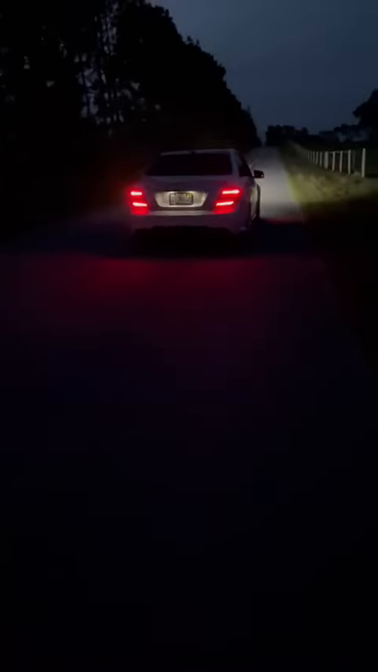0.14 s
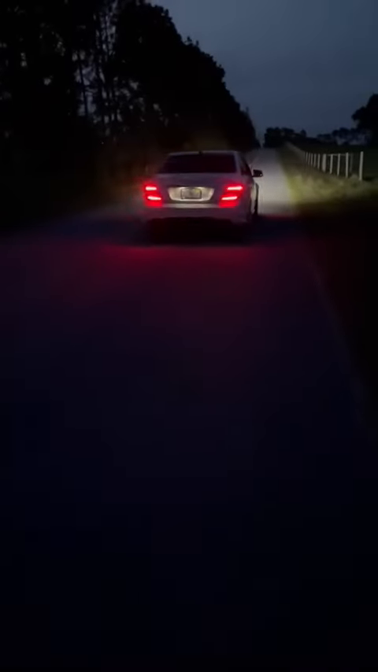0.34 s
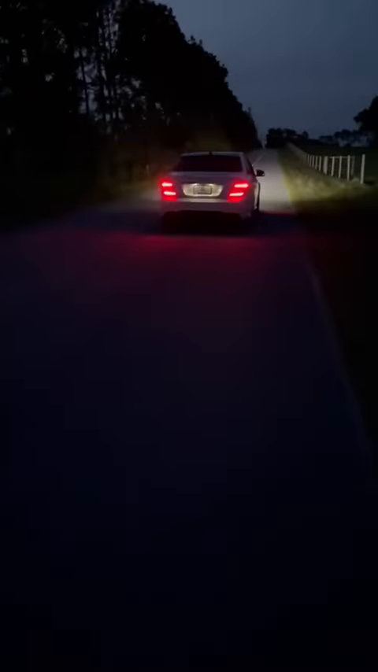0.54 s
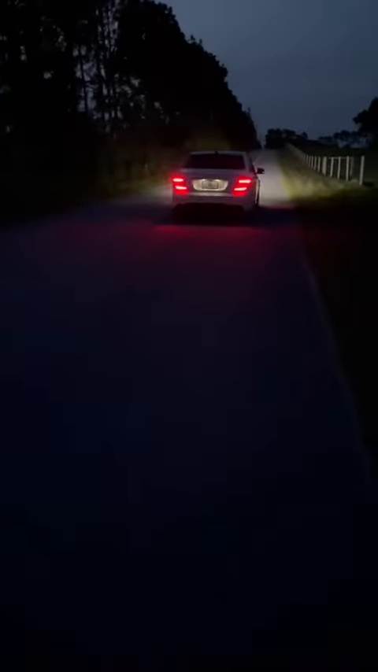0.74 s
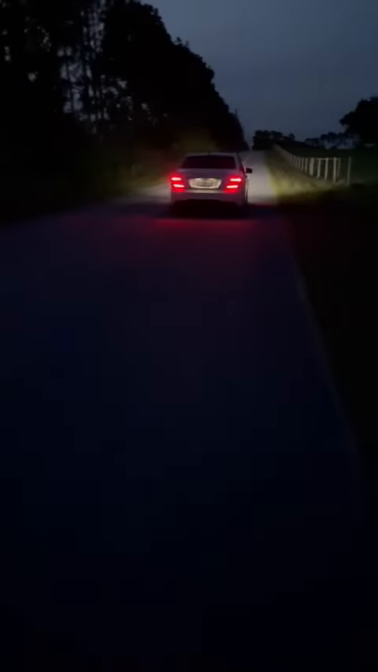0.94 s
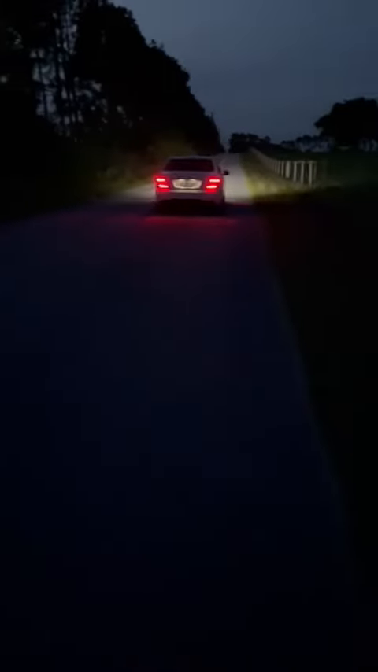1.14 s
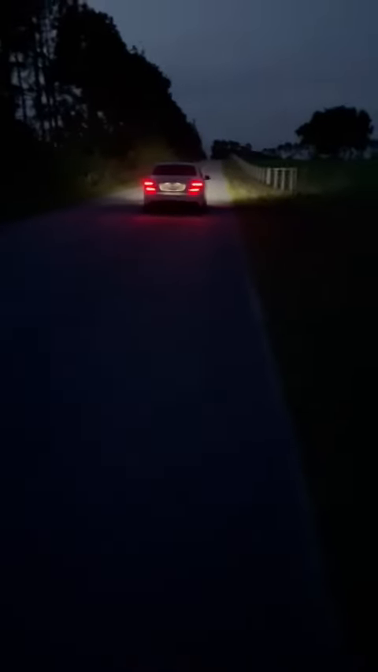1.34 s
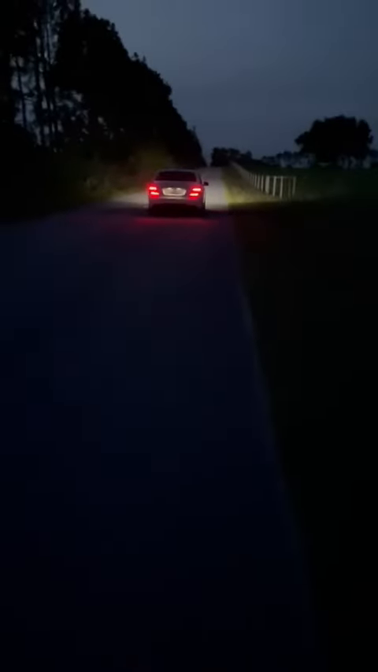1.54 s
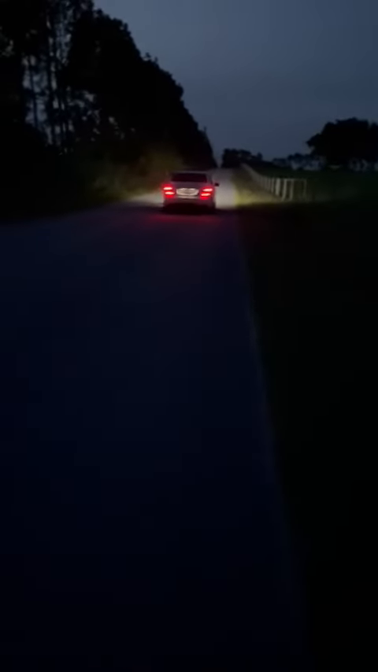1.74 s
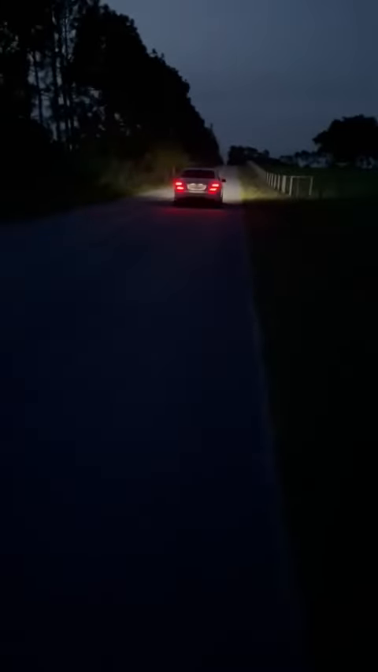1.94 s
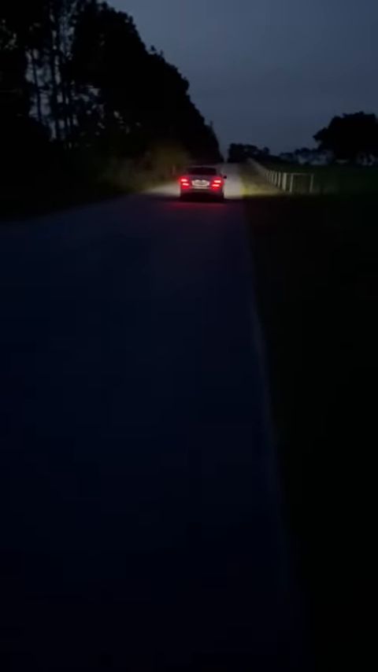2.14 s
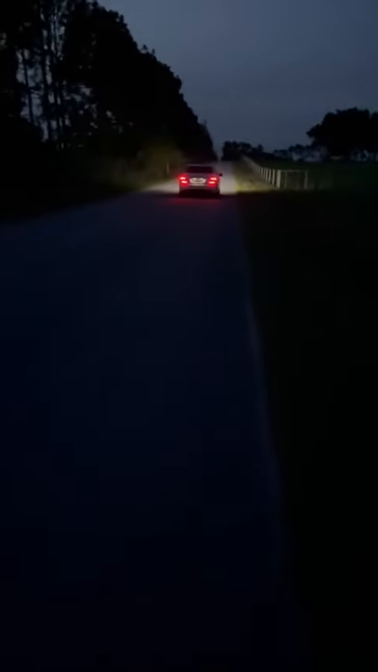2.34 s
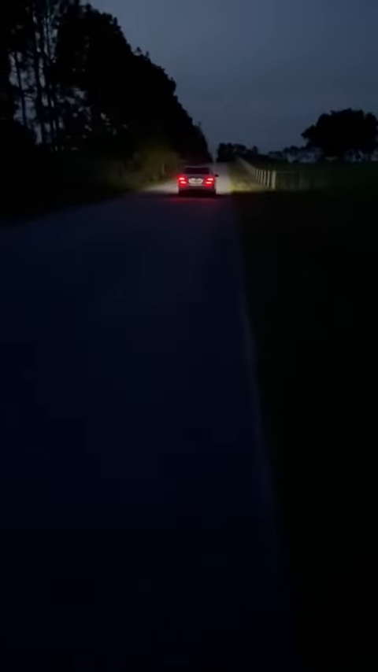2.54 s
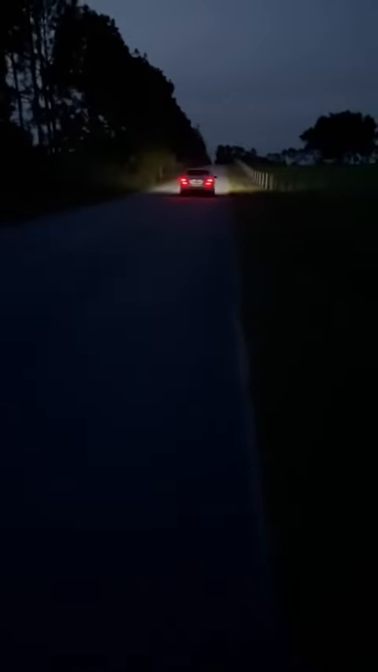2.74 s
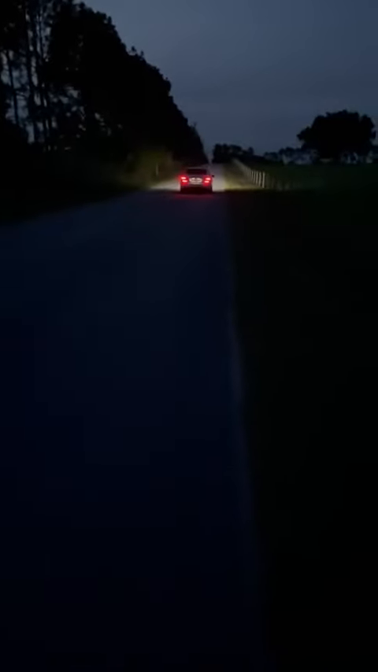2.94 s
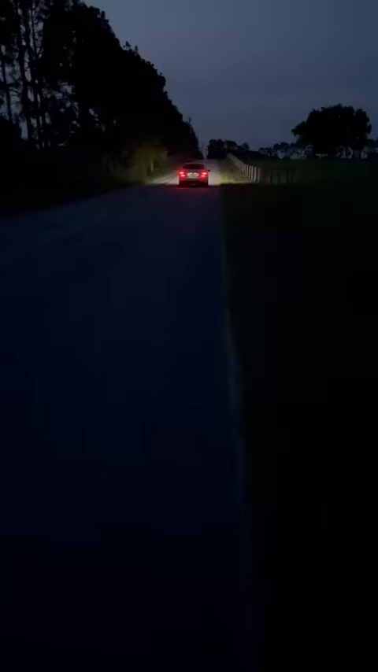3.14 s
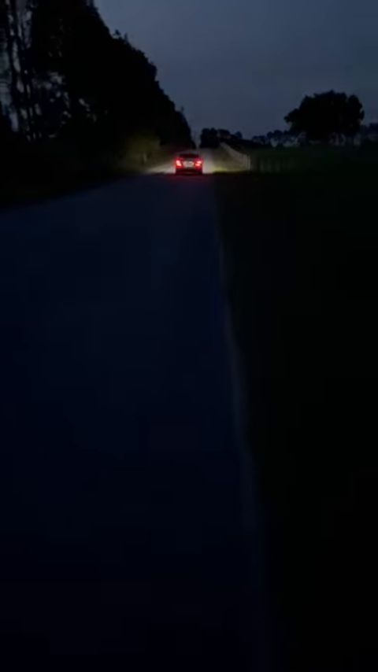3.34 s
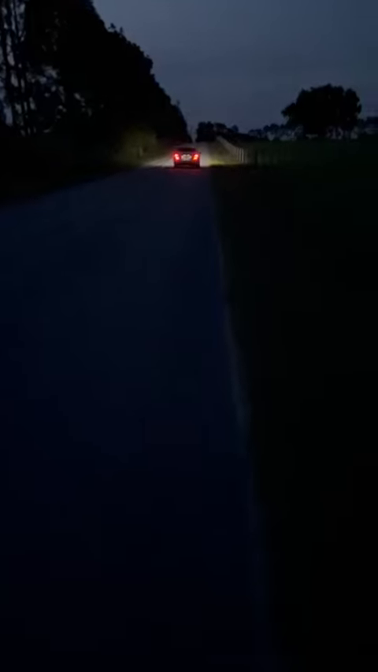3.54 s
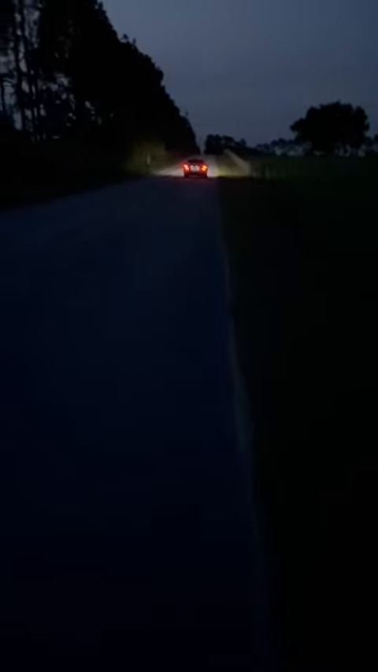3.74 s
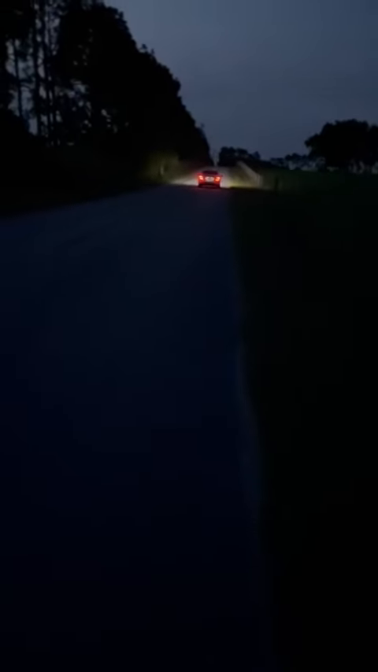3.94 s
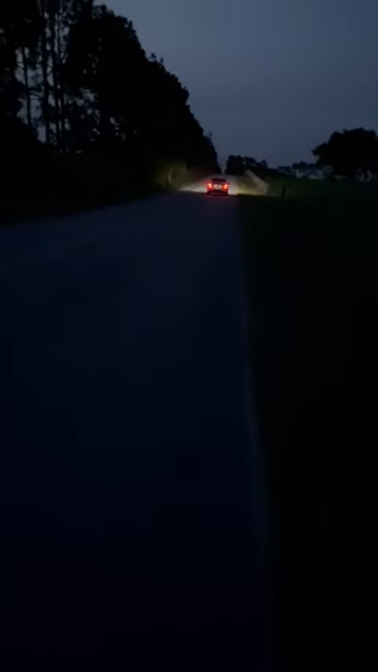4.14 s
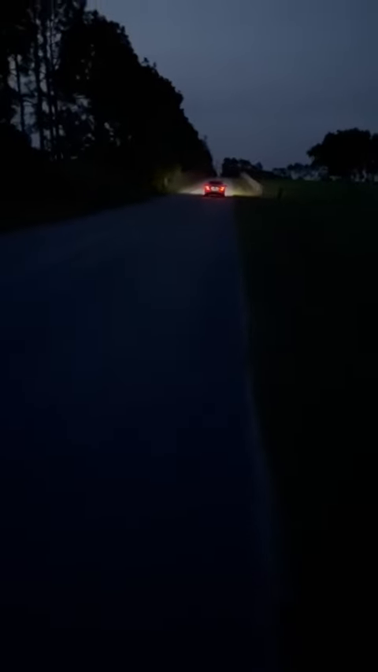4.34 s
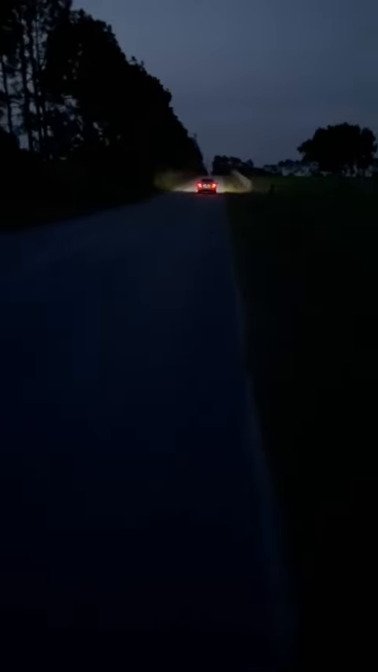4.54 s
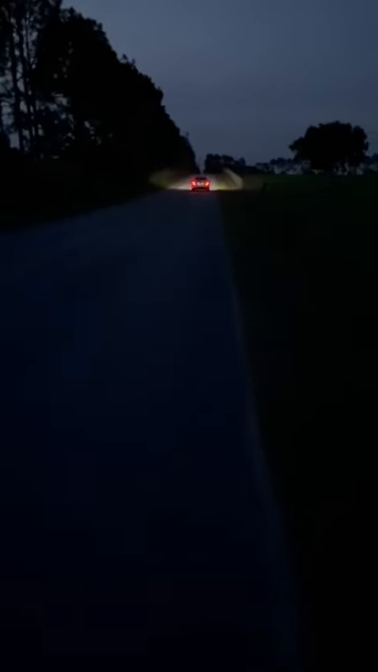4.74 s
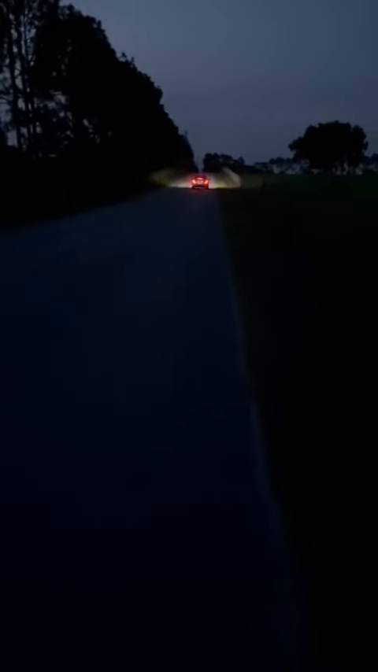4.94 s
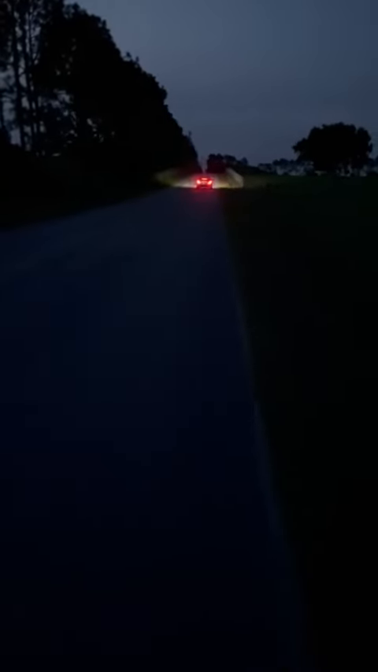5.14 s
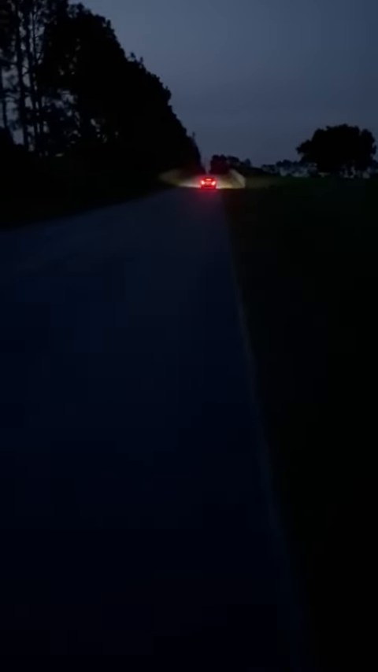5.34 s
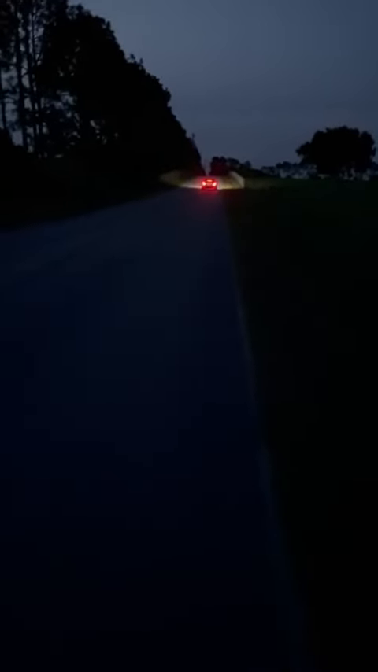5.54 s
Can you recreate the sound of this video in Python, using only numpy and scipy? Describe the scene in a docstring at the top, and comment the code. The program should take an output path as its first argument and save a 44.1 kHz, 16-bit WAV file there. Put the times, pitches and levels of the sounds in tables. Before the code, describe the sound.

Throaty exhaust drone climbs, dips at two gear changes and recedes into the distance, leaving quiet road hiss and light wind buffeting.

```python
"""A six-cylinder car with a loud exhaust pulls away down a country road at dusk, shifts up twice, then lifts off.
Each firing gives a boom and overtones; the overtones light up as they sweep through the pipe's modes.
The two banks fire unevenly. Gas roar, tyre wash and a low rumble are shaped noise with levels that follow curves.
A handheld phone with two microphone ports listens from behind, buffeted by a light wind, with a few faint ticks
close to it."""
import sys
import numpy as np
from scipy import signal
from scipy.fft import rfft, irfft, next_fast_len
from scipy.io import wavfile
from scipy.ndimage import uniform_filter1d

SR = 44100
rng = np.random.default_rng(int(sys.argv[2]) if len(sys.argv) > 2 else 0)


def waveform_to_disk(signal):
    """Save audio, clipped to [-1, 1], as 16-bit WAV at the path in sys.argv[1]."""
    frames = np.transpose(np.atleast_2d(signal))
    scaled = np.clip(frames, -1, 1) * 32767
    samples = np.round(scaled).astype(np.int16)
    wavfile.write(sys.argv[1], SR, samples)


N = 247401

# Noise of car and road: (time [s], exhaust roar [dB], gas hiss [dB], hiss lift above about 3 kHz [dB],
# tyre wash [dB])
NOISE_LEVELS = [(0, -33.5, -34.5, 8.5, -51.5), (.4, -36, -38.5, 7.5, -50), (.8, -32, -35.5, 4.5, -53.5),
                (1.3, -41.5, -36, 3, -51.5), (2.2, -27.5, -35, .5, -35.5), (2.8, -34.5, -36.5, -0.5, -36),
                (3.5, -34, -44, 7, -39), (4, -32, -45, 8.5, -38.5), (4.35, -31, -41, 2.5, -39),
                (4.7, -39, -44.5, 1.5, -40.5), (5.1, -49.5, -49.5, -3.5, -37),
                (5.61, -47.5, -55.5, -10, -39)]
START_M, AWAY_M_PER_S = 9.7, 4.87  # distance at the start, and the steady speed of receding
LIFT_S, LIFT_OVER_S, LIFT_DB = 4.5, 0.62, -18.5  # the driver lifts off: start, duration, change of level


def gain_of(db):
    """Amplitude factor of a level in dB."""
    return 10 ** (np.asarray(db) / 20)


def evened(x):
    """The signal scaled to rms 1."""
    return x / np.sqrt(np.mean(x ** 2) + 1e-20)


def read(points, hz):
    """A spectrum table read on a log-frequency axis."""
    f, value = np.transpose(points)
    return np.interp(np.log(hz + 1), np.log(f + 1), value)


def columns(rows, t):
    """Every column of a curve table at the times t."""
    s, *cols = np.transpose(rows)
    return [np.interp(t, s, c) for c in cols]


def wander(hz):
    """Slow chance of rms 1 with little above hz."""
    lowpass = signal.butter(2, hz, fs=SR, output="sos")
    settled = signal.sosfilt(lowpass, rng.standard_normal(N + SR))[SR:]
    return evened(settled)


def ring(x, hz, width):
    """A fixed resonance of gain 1 at its centre."""
    return signal.lfilter(*signal.iirpeak(hz, hz / width, SR), x)


def ports(x, column):
    """The two microphone ports hear one sound with a different phase and level at each frequency."""
    # (frequency [Hz], left's lead for the exhaust [rad], left's lead for the spread-out road wash [rad])
    port_phase = [(40, 0, -.6), (250, 0, -2.5), (310, .2, -2.9), (400, .75, -3.3), (500, 1.4, -4.1),
                  (600, 1.9, -6.6), (800, 2.7, -5.2), (1000, 4.4, -3), (1250, 5.7, -1.5), (1400, 6.4, -.4),
                  (1550, 5.3, .1), (1700, 5.6, -.8), (2000, 6.1, -.3), (2600, 5.8, -.6), (3000, 6.3, -.4),
                  (3800, 6.1, -.4), (4300, 6.5, 0), (4800, 8.8, 1.8), (6000, 7, .6), (8000, 8.5, 2.2),
                  (9000, 9.42, 3.14), (11500, 9.42, 3.14), (13500, 12.4, 6.1), (14000, 12.57, 6.28)]
    # (frequency [Hz], left minus right [dB])
    port_balance = [(260, 0), (350, -1.5), (500, 1.5), (620, 9), (750, 12.5), (1000, 8.5), (1250, 3.5),
                    (1550, 8), (2000, 2.5), (2700, 0), (3400, .5), (4200, -4.5), (4800, -4), (5300, 0)]
    size = next_fast_len(N + 8192)
    hz = np.fft.rfftfreq(size, 1 / SR)
    lead = read(np.array(port_phase)[:, [0, column]], hz)
    # each port takes half of the difference
    lean = gain_of(read(port_balance, hz) / 2) * np.exp(.5j * lead)
    pair = np.array([lean, 1 / lean])
    pair = pair / np.sqrt(np.mean(abs(pair) ** 2, axis=0))
    return irfft(rfft(x, size) * pair, size)[:, :N]


def air_noise(colour, level_db, patchy_db, bins=10, spans=14):
    """Two partly alike noises of one colour with drifting patches, following a level curve."""
    # likeness of the two ports' noise: (frequency [Hz], likeness [0-1])
    port_alike = [(30, .9), (100, .99), (420, .985), (550, .93), (800, .6), (1000, .93), (3000, .9),
                  (4000, .72), (5000, .55), (7500, .7), (8500, .9), (9000, .99), (15000, .99)]
    frames, hz = N // 256 + 5, np.fft.rfftfreq(1024, 1 / SR)
    a, b, c, d, patches = rng.standard_normal((frames, 513, 5)).T
    patches = uniform_filter1d(patches, size=bins, axis=0)
    patches = evened(uniform_filter1d(patches, size=spans, axis=1))
    alike = read(port_alike, hz)[:, None]
    left = a + 1j * b
    right = alike * left + np.sqrt(1 - alike ** 2) * (c + 1j * d)
    spectra = np.array([left, right]) * gain_of(read(colour, hz)[:, None] + patchy_db * patches)
    noise = signal.istft(spectra, nperseg=1024, noverlap=768)[1][:, :N]
    return gain_of(level_db) * evened(noise)


def far_db(t):
    """Spreading loss as the car draws away."""
    return -20 * np.log10(1 + AWAY_M_PER_S * t / START_M)


def lift_db(t):
    """Loss of level as the throttle closes."""
    return LIFT_DB * np.clip((t - LIFT_S) / LIFT_OVER_S, 0, 1)


def firing():
    """The firing rate and its running phase: a pull in each gear, a fall at each upshift, then coasting."""
    # (time [s], firing rate [Hz])
    firing_rate = [(0, 138.8), (.1, 142.6), (.3, 147), (.58, 151.5), (.68, 143.7), (.88, 126.4),
                   (.96, 117.3), (1.12, 113.7), (1.3, 116), (1.6, 123.4), (2.1, 142.5), (2.5, 155.5),
                   (2.8, 165.7), (3.2, 174.3), (3.48, 177.6), (3.6, 176.4), (3.75, 162), (3.9, 143.9),
                   (4.05, 135.1), (4.16, 129), (4.35, 132.8), (4.8, 133.2), (5.2, 130.5), (5.61, 131)]
    hz = columns(firing_rate, np.arange(N) / SR)[0]
    unsteady_hz = uniform_filter1d(hz, size=1500) * (1 + 0.0024 * wander(25))
    return hz, 2 * np.pi * np.cumsum(unsteady_hz) / SR


def firing_boom(t, hz, turn):
    """The firing tone, a sine loudest where its rate meets the silencer's resonance."""
    # level close by: (firing rate [Hz], level [dB])
    boom_level = [(114, -9), (125, -7), (138, -6.5), (152, -7.5), (165, -10), (178, -15)]
    # brief dips as the boom settles: (time [s], half width [s], change [dB])
    boom_dips = [(5.12, .15, -6), (5.03, 0.018, -13), (5.12, 0.016, -15), (5.7, 0.024, -8)]
    level_db = read(boom_level, hz) + far_db(t) + lift_db(t)
    level_db += sum(db * np.exp(-((t - s) / w) ** 2) for s, w, db in boom_dips)
    level_db += 0.5 * wander(40)
    level_db += 2.0 * lift_db(t) / LIFT_DB * wander(17)  # less steady off the throttle
    return np.sqrt(2) * gain_of(level_db) * np.cos(turn)


def firing_overtones(t, hz, turn, drive_db):
    """Multiples 2 to 6 of the firing rate; faster firing gives steeper pulses and so a brighter tilt."""
    faster_hz = hz - 150
    tilt_db = -2 + 0.0943 * faster_hz + 1.01 * t  # per multiple, around the third
    top_db = -2 - 0.0364 * faster_hz - 1.5 * t  # added to the fifth and sixth
    second_db = -0.66 * t  # an extra fade of the second
    slip = 0.075 * wander(20)  # firing times scatter, blurring the higher overtones most [rad]
    lope = 0.7 * np.exp(-(t / 1.5) ** 2) * np.cos(turn / 6)  # an early throb once per six firings
    total = 0
    for k in range(2, 7):
        level_db = drive_db + (k - 3) * tilt_db + (k > 4) * top_db
        level_db = level_db + (k > 5) * -3 + (k < 3) * second_db
        throb = (k > 3) * lope  # moves both level and phase of the upper overtones
        total = total + gain_of(level_db) * (1 + throb) * np.cos(k * (turn + slip) + throb)
    return total


def pipe(pulses):
    """The exhaust pipe's modes, each a resonance passed twice, with alternating sign."""
    # (frequency [Hz], width of each pass [Hz], level [dB])
    pipe_modes = [(86.6, 80, 0.5), (231.3, 46.7, 6), (303.7, 57.7, -2), (359, 50.7, -1), (423, 95, -9),
                  (509.5, 47.5, -5), (617.7, 74, -4), (743.4, 50, -7.5), (778, 82, -6), (1006, 230, -22)]
    total = 0
    for k, (hz, width, db) in enumerate(pipe_modes):
        total = total + (-1) ** k * gain_of(db) * ring(ring(pulses, hz, width), hz, width)
    return total


def exhaust():
    """Firing pulses: a clean boom, and overtones, uneven banks and unlike cylinders that ring the pipe."""
    # drive into the pipe: (time [s], overtones [dB], bank mismatch [dB])
    engine_drive = [(0, -22.5, -25.5), (.3, -24.5, -24), (.7, -21.5, -28), (1, -25, -32.5), (1.3, -24, -36),
                    (1.6, -29, -36), (1.9, -23, -28.5), (2.15, -17.5, -32.5), (2.65, -16, -42.5),
                    (2.9, -17.5, -34), (3.1, -21, -35.5), (3.55, -22, -37.5), (3.68, -16.5, -47),
                    (3.82, -21.5, -43), (4, -28.5, -42.5), (4.2, -31, -40.5), (4.5, -31, -39),
                    (4.7, -44.5, -43.5), (5.05, -56.5, -62), (5.61, -60, -62)]
    t = np.arange(N) / SR
    drive_db, bank_db = columns(engine_drive, t)
    hz, turn = firing()
    cylinder_db = -40 + far_db(t) + lift_db(t)
    # every second firing is stronger
    banks = sum(gain_of(-1.5 * k) * np.cos((k + .5) * turn) for k in range(7))
    # a six-firing pattern
    cylinders = sum(np.cos(k * turn / 6 + 2 * np.pi * rng.random()) for k in range(2, 42) if k % 3)
    uneven = gain_of(bank_db) * banks + gain_of(cylinder_db) * cylinders
    pulses = (1 + 0.027 * wander(42)) * firing_overtones(t, hz, turn, drive_db)
    pulses += (1 + 0.34 * wander(39)) * uneven  # no two burns are alike
    pulses += gain_of(cylinder_db + 15.0) * rng.standard_normal(N)  # turbulence makes the modes rasp
    return firing_boom(t, hz, turn) + pipe(pulses), turn


def roar(turn):
    """Turbulent gas leaving the pipe, puffing with each firing, over a low rumble."""
    # noise colours: (frequency [Hz], relative level per Hz [dB])
    hiss_colour = [(300, -28.5), (500, -9.5), (900, 0), (1250, -3.5), (1450, -10), (1700, -7.5),
                   (2300, -12), (3000, -16), (3500, -23.5), (4300, -24), (5300, -31), (7000, -32),
                   (8600, -33.5), (11000, -53.5), (14000, -48), (15500, -63)]
    roar_colour = [(50, -28.5), (80, 2), (130, 2), (200, 0), (300, -18), (420, -5), (550, 1.5), (700, 0.5),
                   (850, -1), (1100, -26.5), (1600, -57)]
    rumble_colour = [(15, -19.5), (30, 0.5), (50, 4), (70, 1), (100, -15), (140, -37)]
    # (time [s], level [dB])
    rumble_level = [(0, -39.5), (.6, -40.5), (1.4, -42), (2.1, -44.5), (3.2, -51.5), (4.2, -63),
                    (5.61, -57)]
    t = np.arange(N) / SR
    roar_db, hiss_db, bright_db, _ = columns(NOISE_LEVELS, t)
    gas = air_noise(hiss_colour, hiss_db, patchy_db=1.5) * (1 + 0.12 * np.cos(turn))
    treble = gas - signal.sosfiltfilt(signal.butter(2, 3200, fs=SR, output="sos"), gas)
    gas += (gain_of(bright_db + 1.2 * wander(21)) - 1) * treble  # the treble also flickers
    gas += air_noise(roar_colour, roar_db, patchy_db=0.5) * (1 + 0.051 * np.cos(turn))
    return gas + air_noise(rumble_colour, columns(rumble_level, t)[0], patchy_db=7.5)


def tyre_wash():
    """The wash of tyres on the road, spread along the verge; narrow bands of it swell and linger."""
    # (frequency [Hz], relative level per Hz [dB])
    wash_colour = [(150, -3.5), (250, -13), (360, -21), (500, -13.5), (700, -3), (900, -0.5), (1100, 1.5),
                   (1300, -3.5), (1500, -6), (1750, -16), (2300, -22.5), (3400, -26.5), (4800, -34),
                   (8000, -52), (14000, -71.5)]
    wash_db = columns(NOISE_LEVELS, np.arange(N) / SR)[3]
    return air_noise(wash_colour, wash_db, patchy_db=4.0, bins=2, spans=30)


def wind():
    """Lumpy low gusts that push one port while they pull the other."""
    # buffeting at the ports: (time [s], level [dB])
    gust_level = [(0, -41.5), (.8, -41.5), (2.4, -46), (2.9, -33.5), (3.5, -33.5), (3.85, -27),
                  (4.3, -34.5), (4.7, -38.5), (5.61, -39)]
    # (frequency [Hz], relative level per Hz [dB])
    gust_colour = [(25, -33), (45, -15), (80, -4), (135, 9.5), (200, 3), (275, -1.5), (330, -52)]
    level_db = columns(gust_level, np.arange(N) / SR)[0] + 2.5 * wander(10)
    gusts = air_noise(gust_colour, level_db, patchy_db=1.0)[0]
    return np.array([gusts, -gusts])


def ticks():
    """Faint ticks near the phone, each a short soft burst of noise with a fuzzy ring in it."""
    # (time [s], relative level [dB], ring [Hz])
    tick_list = [(3.6376, -44, 5416), (4.2346, -55.5, 5800), (4.8319, -55, 6000), (4.8966, -55, 5550)]
    out, t = np.zeros(N), np.arange(600) / SR
    envelope_db = 1.0 - 60 * t / 0.033  # falls 60 dB in 33 ms
    onset = np.minimum(t / 0.0011, 1)
    for s, db, hz in tick_list:
        noise = np.diff(rng.standard_normal(len(t) + 1))
        burst = 0.23 * noise + evened(ring(noise, hz, 900))
        out[round(s * SR):][:len(t)] += gain_of(db + envelope_db) * burst * onset
    return out


def scene():
    """The car and the road wash reach the ports from different directions."""
    tone, turn = exhaust()
    car = ports(tone + roar(turn) + ticks(), column=1)
    road = ports(tyre_wash(), column=2)
    return car + road + wind()


def record(dry):
    """The microphone's bass cut below 45 Hz, then the band limit at 15.7 kHz."""
    cut = signal.sosfilt(signal.butter(2, 45, "high", fs=SR, output="sos"), dry)
    band_limit = signal.firwin(511, 15700, window=("kaiser", 9), fs=SR)
    return signal.oaconvolve(cut, band_limit[None], "same")


dry = scene()
out = record(dry)
waveform_to_disk(out)
```